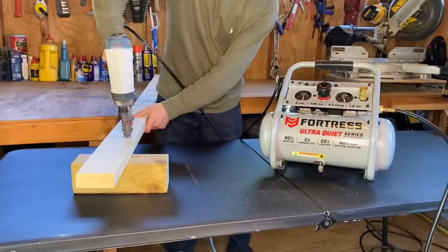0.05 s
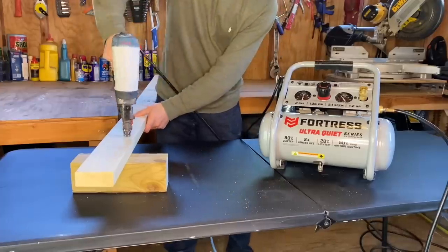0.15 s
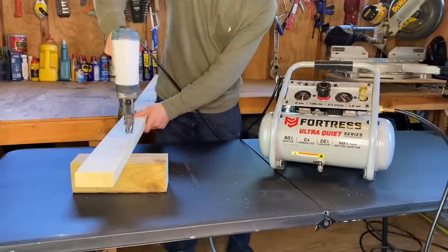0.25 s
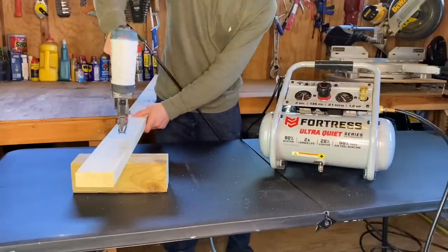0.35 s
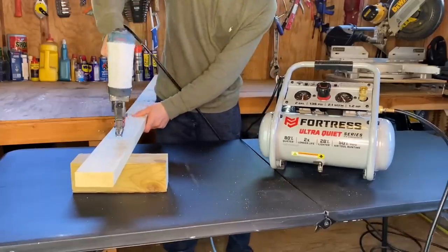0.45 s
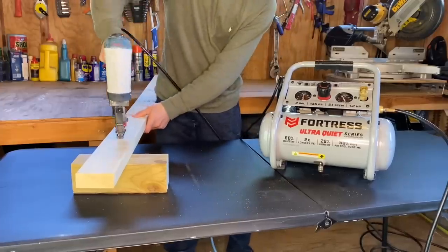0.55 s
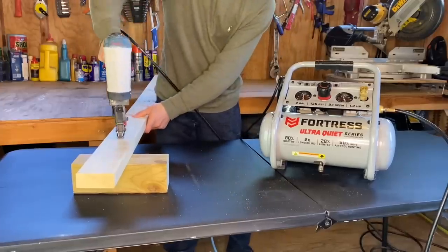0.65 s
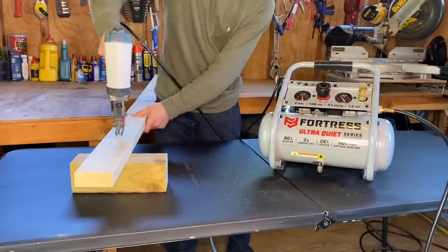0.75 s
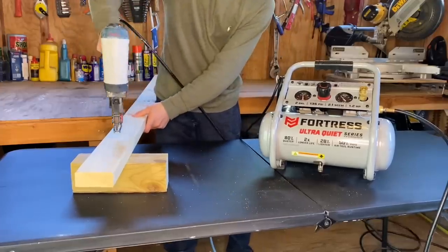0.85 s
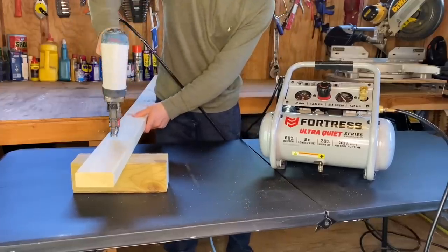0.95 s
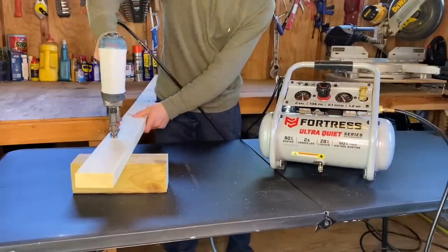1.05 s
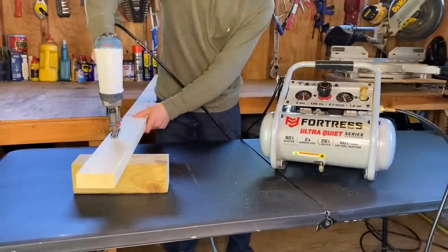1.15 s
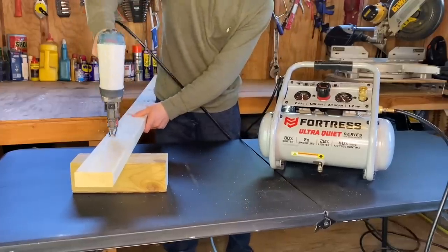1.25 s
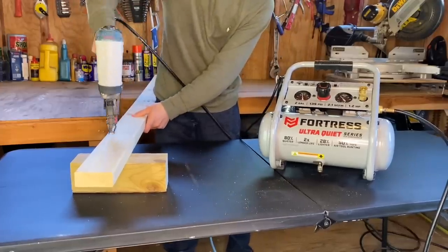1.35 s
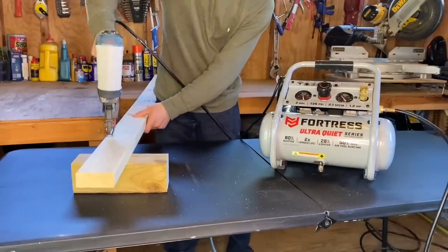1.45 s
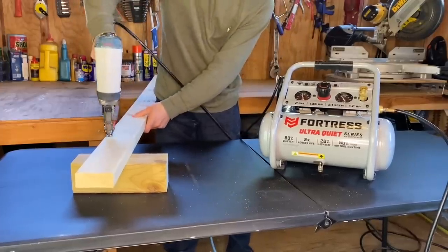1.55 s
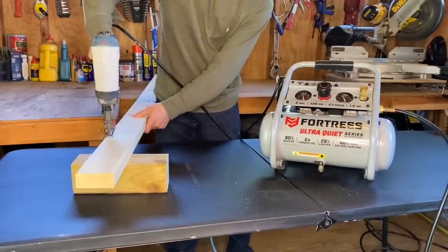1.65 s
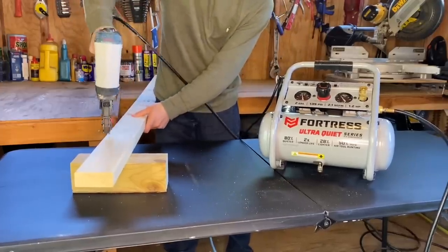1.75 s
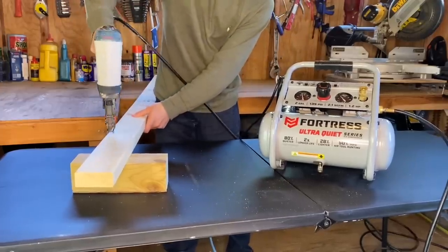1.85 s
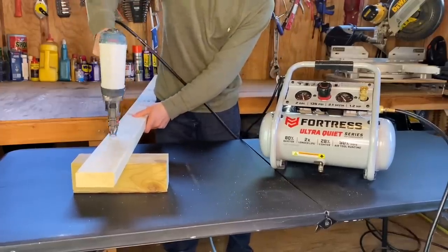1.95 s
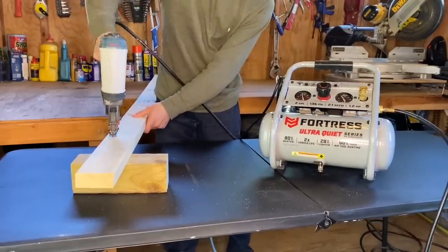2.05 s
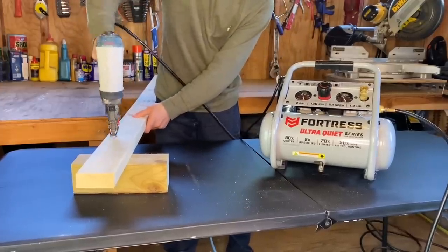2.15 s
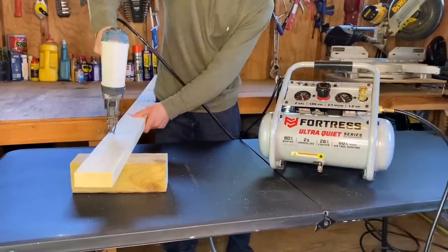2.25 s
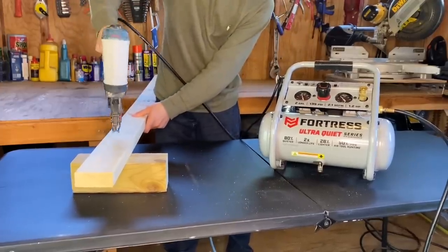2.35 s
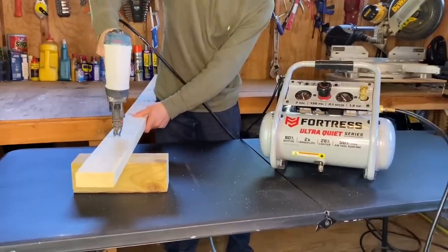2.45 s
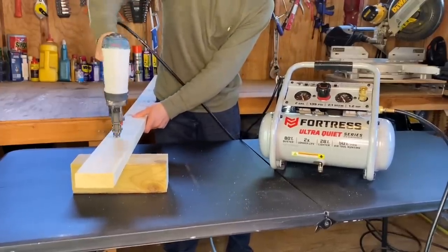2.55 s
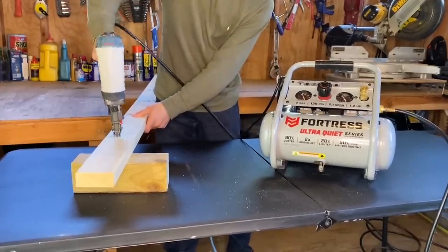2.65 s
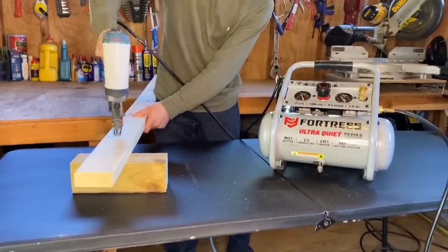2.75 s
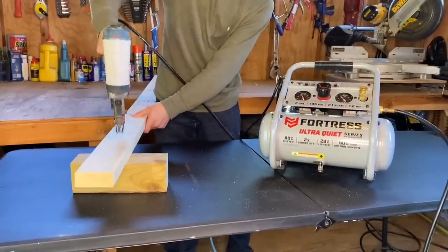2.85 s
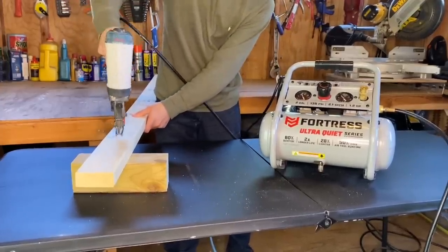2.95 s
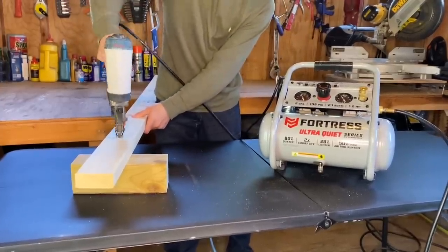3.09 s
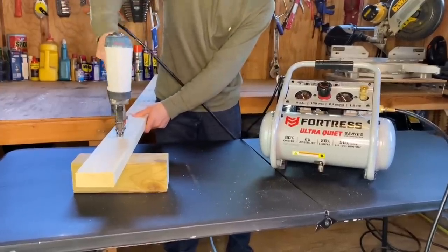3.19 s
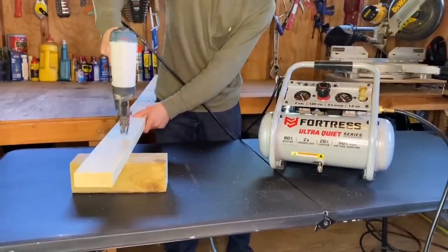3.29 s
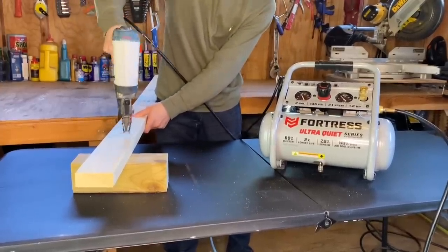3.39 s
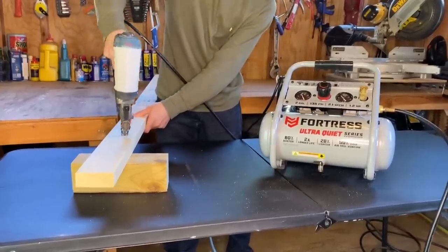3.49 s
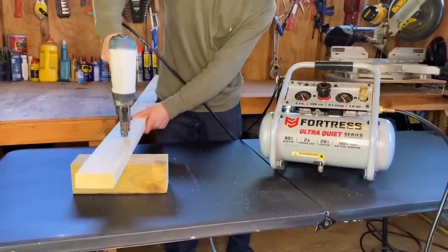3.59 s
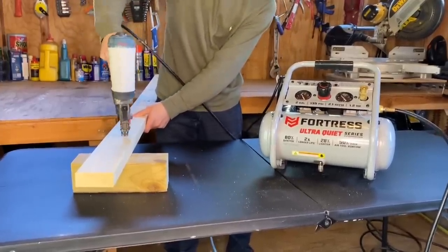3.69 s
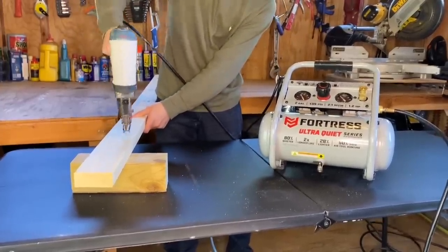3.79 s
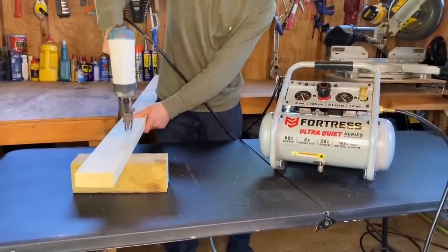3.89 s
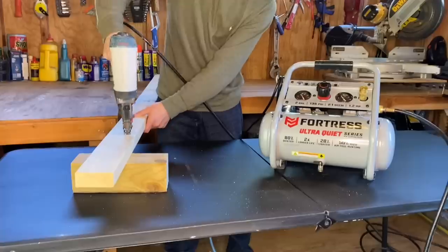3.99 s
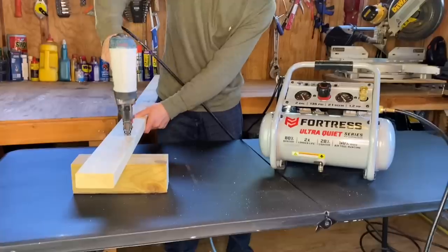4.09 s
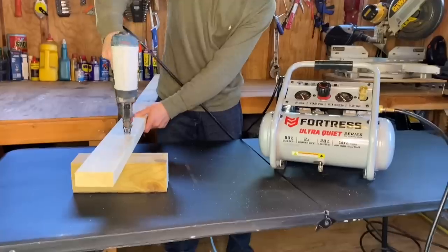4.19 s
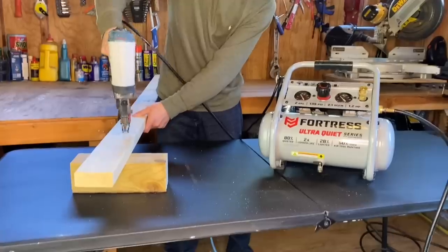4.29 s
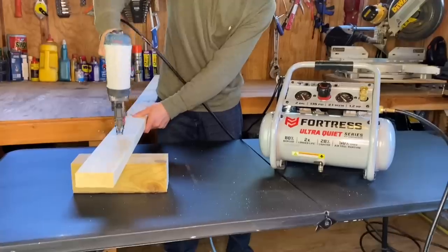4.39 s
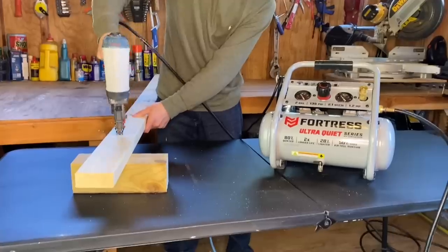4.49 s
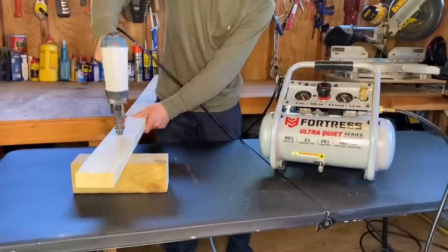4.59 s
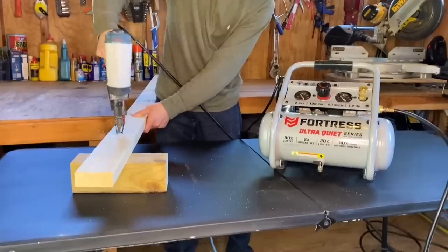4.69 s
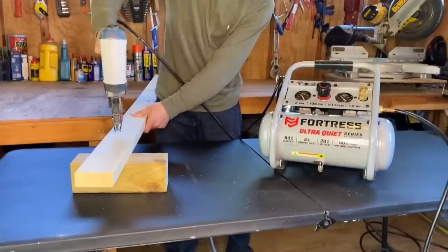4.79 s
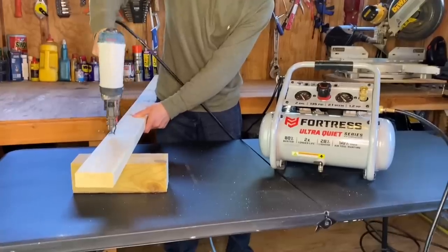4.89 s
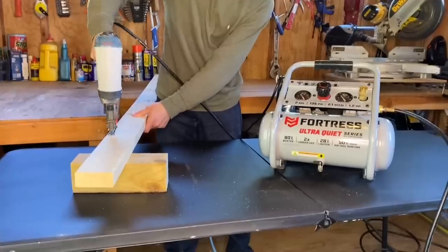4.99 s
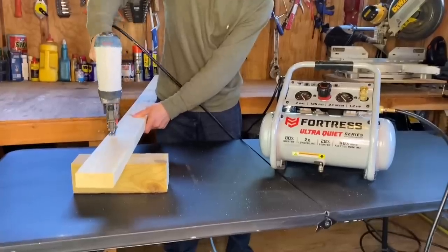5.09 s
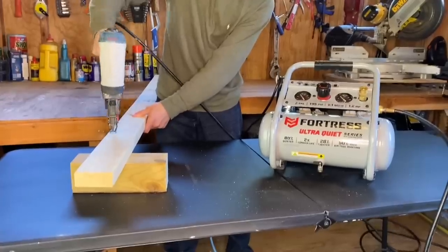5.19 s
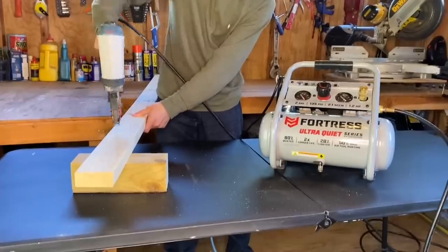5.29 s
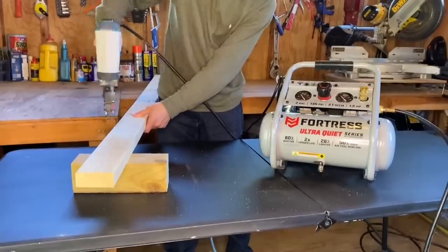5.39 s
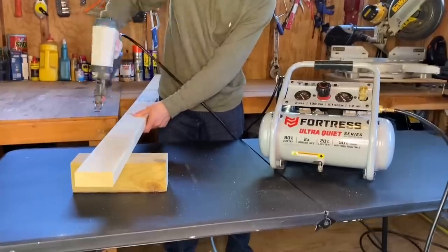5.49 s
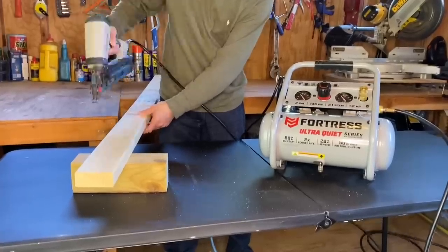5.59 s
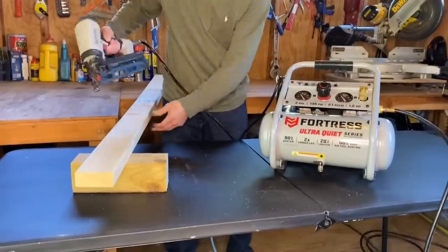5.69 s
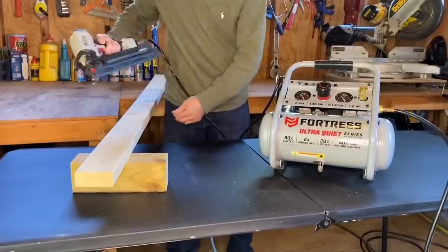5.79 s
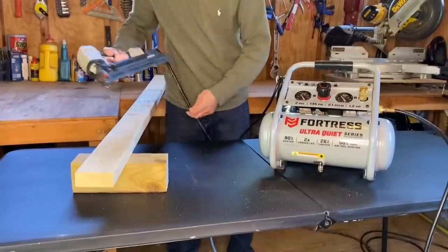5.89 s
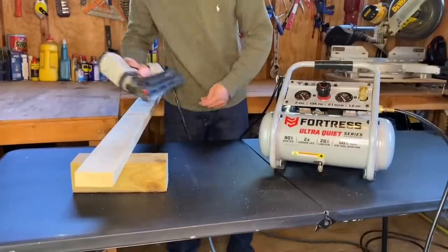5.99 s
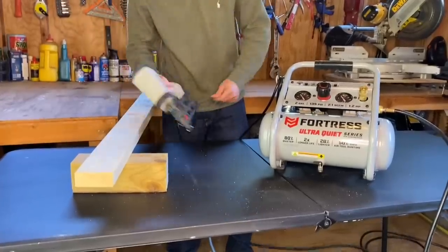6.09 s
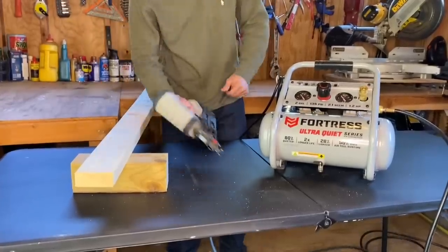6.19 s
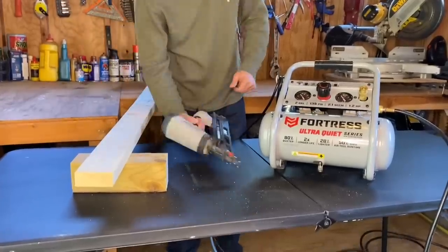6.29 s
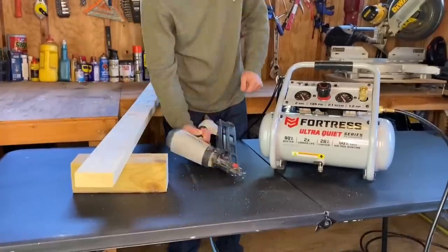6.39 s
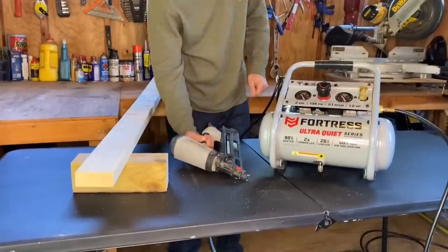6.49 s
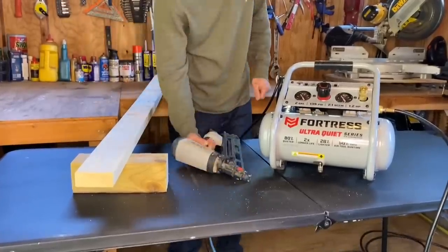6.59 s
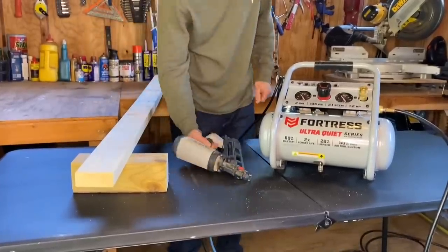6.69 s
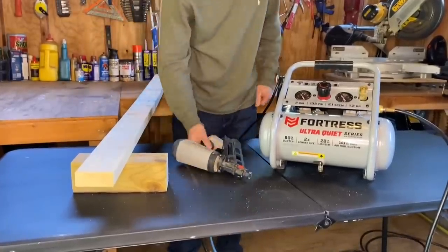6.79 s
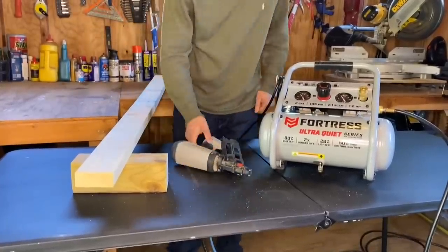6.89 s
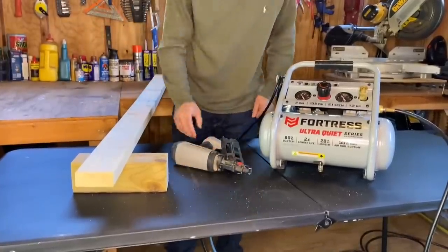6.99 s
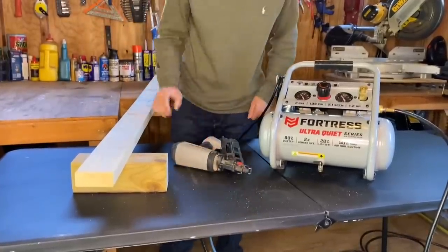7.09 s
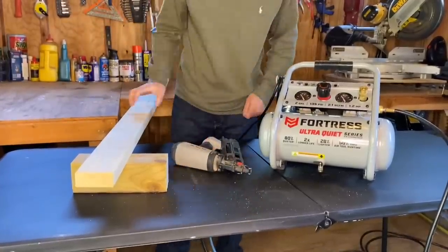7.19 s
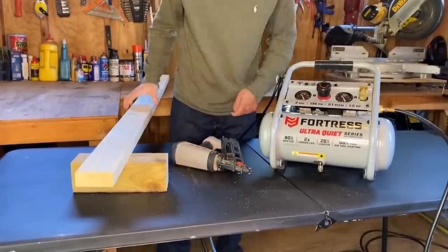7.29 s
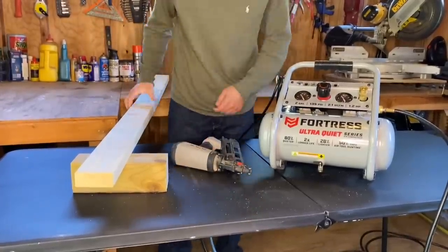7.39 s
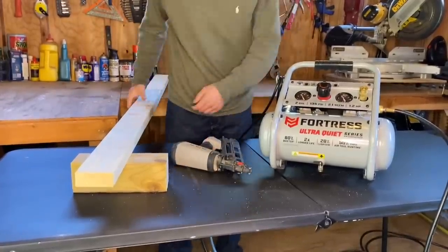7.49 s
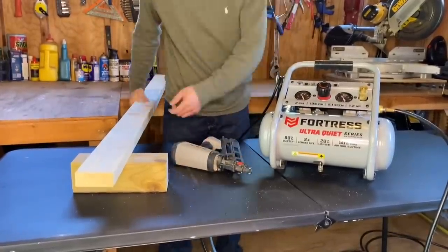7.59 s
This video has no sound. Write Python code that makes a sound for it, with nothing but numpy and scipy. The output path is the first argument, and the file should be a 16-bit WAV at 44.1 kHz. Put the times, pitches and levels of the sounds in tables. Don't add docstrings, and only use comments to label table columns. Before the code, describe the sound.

Close, overloaded sound of nails driven into wood: sharp steel crack, woody thump, short exhaust puff, repeated at an even pace of two per second for five seconds. Light metallic taps and scuffs precede the shots. A low compressor hum starts with a click and brief hiss near two seconds and continues beneath. Finally, dull table knocks and low rumble in a small shop.

```python
import sys
import numpy as np
from scipy import signal
from scipy.fft import rfft, irfft, next_fast_len
from scipy.io import wavfile
from scipy.ndimage import map_coordinates

SR = 44100
rng = np.random.default_rng(int(sys.argv[2]) if len(sys.argv) > 2 else 0)


def master_out(mix):
    frames = np.transpose(np.atleast_2d(mix))
    ceiling = np.clip(frames, -1, 1)
    pcm = np.round(ceiling * 32767).astype(np.int16)
    wavfile.write(sys.argv[1], SR, pcm)


def makeup_ratio(level_db):
    decades = np.asarray(level_db, float) / 20
    return 10 ** decades


N = 337263
PAD = 4096
T = np.arange(N + PAD) / SR - PAD / SR

# (trigger time [s], bite of the nail [dB])
SHOTS = [(-.0285, -1.5), (0.5335, -11), (1.0455, -3), (1.5344, -7.5), (2.0394, -11), (2.518, -4),
         (3.016, -6), (3.508, -5.5), (3.98, -1), (4.4465, -3.5), (4.9555, -4.5)]
BRIGHT_DB = [-0.9, 0.89, 0.21, 0.19, 0.19, -0.41, -1, -1.5, 0.049, -0.37, -1.8]
CYCLE_MS = [115, 116, 115.6, 116.9, 117.3, 118.9, 119.75, 121.7, 122.3, 123.8, 123.7]
# (frequency [Hz], level [dB/Hz])
CRACK = [(1060, -17.5), (1800, -0.5), (3800, -2), (4390, -9), (6620, -4), (7180, -5.5), (8230, -4),
         (13000, -19.5), (15900, -36.5)]
# (frequency [Hz], level [dB/Hz])
SPIT = [(5000, -36.5), (8000, -2.5), (11500, -0.5), (14500, -5), (15900, -15)]

STRIKE_MS, REBOUND_MS, REBOUND_DB = 26.7, 17, -10.5
TRIGGER_S, BITE_DB = np.transpose(SHOTS)
STRIKE_S = TRIGGER_S + STRIKE_MS / 1000
HOME_S = TRIGGER_S + np.array(CYCLE_MS) / 1000
SEATED_S = STRIKE_S + (3.3 + .125 * np.maximum(np.array(CYCLE_MS) - 118, 0)) / 1000
ALIKE_DB = 1.8
SHAFT_HZ, TOP_ORDER = 28.02, 44


def unit(x):
    return x / np.sqrt(np.mean(x ** 2) + 1e-20)


def along(points, hz):
    f, v = np.transpose(points)
    return np.interp(np.log(hz + 1), np.log(f + 1), v)


def coloured(x, spectrum):
    magnitude = makeup_ratio(along(spectrum, np.fft.rfftfreq(PAD, 1 / SR))) + 1e-6
    cep = irfft(np.log(magnitude))
    cep[1:PAD // 2] *= 2
    cep[PAD // 2 + 1:] = 0
    h = irfft(np.exp(rfft(cep)))
    return signal.fftconvolve(x, h / np.linalg.norm(h))[:len(x)]


def add(track, s, sound):
    track[round(s * SR) + PAD:][:len(sound)] += sound


def empty():
    return np.zeros(len(T) + SR)


def noise():
    return rng.standard_normal(len(T))


def step(at, slow):
    return .5 + .5 * np.tanh((T - at) / slow)


def gain_curve(rows):
    rows = np.array(rows)
    return makeup_ratio(np.interp(T, rows[:, 0], rows[:, 1], left=-120, right=-120))


def bursts(times, db, rise, t60, spectrum, tail_db, tail_t60, alike=0):
    track, t = empty(), np.arange(SR // 2) / SR
    tail = makeup_ratio(tail_db - 60 * t / tail_t60) * (1 - np.exp(-t / 0.0083))
    shape = np.hypot(makeup_ratio(-60 * t / t60), tail) * (1 - np.exp(-t / rise))
    same = rng.standard_normal(len(t))
    for s, level_db in zip(times, db):
        hiss = np.sqrt(alike) * same + np.sqrt(1 - alike) * rng.standard_normal(len(t))
        grain_db = map_coordinates(rng.standard_normal(len(t) // 20), [t / .002])
        add(track, s, makeup_ratio(level_db) * shape * unit(makeup_ratio(grain_db) * hiss))
    return coloured(track[:len(T)], spectrum)


def ringing(modes, scatter_db, rise=.0001):
    t = np.arange(0, min(.5, np.max(modes, axis=0)[-1]), 1 / SR)
    ring = 0
    for hz, db, t60 in modes:
        strength_db = db + rng.normal(0, scatter_db)
        ring = ring + makeup_ratio(strength_db - 60 * t / t60) * np.sin(2 * np.pi * hz * t)
    return ring * (1 - np.exp(-t / rise))


def resonant(peaks):
    f = np.fft.rfftfreq(len(T), 1 / SR)
    gain = sum(makeup_ratio(db) * f * w / np.hypot(c * c - f * f, f * w) for c, w, db in peaks)
    gain = gain / (1 + (f / 11000) ** 6)
    return unit(irfft(rfft(noise()) * gain, len(T)))


def room(x):
    # (frequency [Hz], T60 [s])
    decay_times = [(60, 0.62), (260, 0.32), (700, 0.32), (1800, 0.26), (5000, 0.38), (13000, 0.22)]
    hz, t, z = signal.stft(rng.standard_normal(SR // 2), SR, nperseg=256)
    decay = makeup_ratio(-60 * t / along(decay_times, hz)[:, None])
    tail = signal.istft(z * decay, SR, nperseg=256)[1]
    return signal.fftconvolve(np.pad(x, (200, 0)), tail / np.linalg.norm(tail))[:len(x)]


def plank():
    mode_hz = [70, 123, 174, 262, 329, 372, 448, 560, 618, 800, 405, 1115, 1198, 1366, 1590, 186, 746]
    # (level [dB], T60 [s])
    mode_ring = [(-27.5, 0.31), (-27, 0.58), (-1.5, 0.23), (-10.5, 0.38), (-5, 0.34), (3.5, 0.23),
                 (-16, 0.18), (2, 0.24), (-5.5, 0.32), (1, 0.14), (-0.5, 0.049), (1.5, 0.18), (0.5, 0.14),
                 (-2.5, 0.13), (-2.5, 0.09), (-15, 0.28), (-5, 0.14)]
    return np.column_stack([mode_hz, mode_ring])


def stillness():
    # (frequency [Hz], level [dB/Hz])
    quiet = [(15, -28.5), (25, 4.5), (124, -10), (631, -22.5), (1640, -30), (4730, -25), (6130, -39),
             (8800, -48), (12000, -49.5), (15600, -67), (22000, -120)]
    # (frequency [Hz], width [Hz], level [dB])
    whine = [(3070, 30, 0), (3790, 60, -5), (4610, 25, 0), (7590, 25, -3), (8670, 25, 0), (8970, 22, -2),
             (11200, 25, -8)]
    return makeup_ratio(-54.0) * coloured(noise(), quiet) + makeup_ratio(-66) * resonant(whine)


def table_sway():
    # (time [s], swing [full scale], length [s])
    lurches = [
        (6.325, .05, .07),
        (6.398, -0.089, 0.026),
        (6.502, -0.048, 0.038),
        (6.705, .12, 0.043),
        (7.095, 0.1, 0.059),
        (7.33, 0.074, 0.059),
    ]
    f = np.fft.rfftfreq(len(T), 1 / SR)
    sway = unit(irfft(rfft(noise()) / (1 + (f / 12) ** 4) * (f > 3), len(T)))
    motion = makeup_ratio(-36.5) * step(6.5, .06) * sway
    for s, swing, length in lurches:
        u = ((T - s) / length) ** 2
        motion = motion + swing * (1 - 2 * u) * np.exp(-u)
    return motion


def valves():
    # (frequency [Hz], level [dB])
    reeds = [(740, -33), (1250, 0.5), (2350, -8.5), (3020, -0.5), (3260, -8), (3610, 4), (5000, -22.5),
             (6500, -44), (11000, -120)]
    f = np.fft.rfftfreq(len(T), 1 / SR)
    z = np.zeros(len(f), complex)
    order_hz = SHAFT_HZ * np.arange(TOP_ORDER + 1, 5000 // SHAFT_HZ)
    sizes = makeup_ratio(along(reeds, order_hz) + rng.normal(0, 3, len(order_hz)))
    z[np.searchsorted(f, order_hz)] = sizes * np.exp(2j * np.pi * rng.random(len(order_hz)))
    return unit(irfft(z, len(T)))


def pump_air(turn):
    # (frequency [Hz], level [dB/Hz])
    intake = [(110, -26), (190, -1), (562, -14.5), (714, -1.5), (777, -5), (1030, 1.5), (1250, -6),
              (1830, -20.5), (1970, -7), (2300, -9.5), (2640, -4.5), (3760, -22), (5500, -27), (7150, -60),
              (12100, -120)]
    hiss = [(2940, -22), (5000, -9), (6250, -8.5), (8100, -9), (8780, -12), (10300, -7), (11100, -19.5),
            (13500, -22), (15700, -30)]
    # (frequency [Hz], width [Hz], level [dB])
    shroud = [(2200, 60, -4), (2750, 90, 2.5), (3080, 150, 1.5), (3510, 71, 0), (3910, 38, 2.5),
              (4790, 80, -3.5), (7870, 590, -10.5)]
    pulse = 1 + 0.12 * np.sin(turn) + 0.21 * np.sin(4 * turn) + 0.087 * np.sin(5 * turn)
    air = coloured(pulse * noise(), intake) + makeup_ratio(-4.5) * pulse * resonant(shroud)
    return air + makeup_ratio(-3.5) * valves() + makeup_ratio(-15.5) * coloured(noise(), hiss)


def motor_hum(since, loaded):
    mains_hz = 120
    hum = makeup_ratio(-5 * loaded - 45.5) * np.sin(2 * np.pi * mains_hz * T + 2.0)
    hum = hum + makeup_ratio(-58.0) * np.sin(2 * np.pi * 176 * T)
    hum = hum + makeup_ratio(-61.5) * np.sin(2 * np.pi * 9 * mains_hz * T)
    draw_db = 24 * np.exp(-since / 0.19)
    draw_db = draw_db + 4.5 * np.cos(2 * np.pi * (T - 4.42) / 1.38)
    return makeup_ratio(draw_db) * hum


def compressor():
    # (multiple, level [dB])
    strokes = [(4, 2), (6, -6), (8, -7), (9, -13.5), (11, -12.5), (12, -15), (15, -27.5), (18, -17),
               (23, -19), (25, -13.5), (26, -8.5), (30, -10.5), (32, -17), (33, -6.5), (34, -5), (36, -5.5),
               (37, -13.5), (38, -8), (41, -12), (42, -7)]
    # (time [s], level [dB])
    start_vent = [
        (1.79, -53),
        (1.84, -45.5),
        (1.91, -47.5),
        (1.97, -57),
    ]
    # (frequency [Hz], level [dB/Hz])
    vent_colour = [(2350, -39), (4000, -5), (4570, -23.5), (7850, -8), (10100, -13), (13300, -23),
                   (15000, -32.5)]
    turn = 2 * np.pi * SHAFT_HZ * T
    since = np.maximum(T - 1.83, 0)
    running = 1 - np.exp(-since / 0.14)
    loaded = step(6.75, 0.13)
    strong, orders = dict(strokes), 0
    for k in range(strokes[0][0], TOP_ORDER + 1):
        order_db = strong.get(k, -23 + 5.5 * rng.normal())
        orders = orders + makeup_ratio(order_db) * np.sin(k * turn + rng.uniform(0, 2 * np.pi))
    low = makeup_ratio(-49.5 + 2 * loaded) * np.sin(2 * turn) + makeup_ratio(-56.5 + 12 * loaded) * np.sin(3 * turn)
    puffs = 1 + .5 * np.sin(turn * running)
    vent = gain_curve(start_vent) * puffs * coloured(noise(), vent_colour)
    pump = makeup_ratio(-42.5) * unit(orders) + makeup_ratio(-45.5) * pump_air(turn)
    return running * (pump + motor_hum(since, loaded) + low) + vent


def pressure_switch():
    # (frequency [Hz], level [dB], T60 [s])
    contact = [(2750, 0, 0.011), (3950, -5, 0.011), (9000, -8, .008)]
    track = empty()
    add(track, 1.7262, makeup_ratio(-18) * ringing(contact, .5))
    return track[:len(T)]


def laying_down():
    # (time [s], clack peak [dB], table boom [dB], knock pitch [Hz], knock level [dB])
    impacts = [(6.333, -23.5, -28, 570, -32), (6.36, -26, -26, 312, -30.5), (6.416, -28, -27.5, 327, -33),
               (6.494, -24, -22, 268, -30), (6.515, -43, -40, 175, -35), (6.545, -32, -28.5, 350, -48),
               (6.637, -23.5, -37, 313, -30.5), (6.672, -38, -27.5, 413, -31), (6.745, -32, -39, 246, -43),
               (6.869, -25.5, -31, 177, -30), (6.905, -35, -23.5, 328, -47)]
    # (frequency [Hz], level [dB], T60 [s])
    table = [(83.5, -7, 0.25), (127, 4, 0.25), (175.8, 0.5, 0.44)]
    # (frequency [Hz], level [dB/Hz])
    thud = [(120, -59), (200, -2), (307, 6), (574, 0), (662, -8), (976, -27), (1500, -8), (1950, -52),
            (3300, -120)]
    # (time [s], level [dB])
    clink = [
        (6.3382, -40.5),
        (6.645, -51),
    ]
    wood = empty()
    for at, clack_db, boom_db, hz, db in impacts:
        add(wood, at, makeup_ratio(db) * ringing([(hz, 0, .16)], .5, 0.0051))
        add(wood, at, makeup_ratio(boom_db - 6.5) * ringing(table, 2.9))
        add(wood, at, makeup_ratio(clack_db - 27) * ringing(plank()[3:9], 3.8))
    s, clack_db = np.transpose(impacts)[:2]
    clacks = bursts(s, clack_db - 5.5, 0.00061, 0.037, thud, -8.0, 0.34)
    return wood[:len(T)] + clacks + bursts(*np.transpose(clink), .0004, .03, CRACK, -8, .1)


def nose_contacts():
    # (time [s], tick peak [dB], low knock [dB], scuff
    # [dB])
    contacts = [(0.3841, -43, -45, -35), (0.399, -25.5, -32, -38), (0.431, -29, -24.5, -29),
                (0.878, -33.5, -35, -36.5), (0.9182, -28.5, -26, -36), (1.3523, -40, -38, -37),
                (1.4081, -28, -33.5, -36), (1.726, -19, -45, -35), (1.873, -35, -34, -33),
                (1.92, -25, -27, -37.5), (2.2842, -48, -40, -38), (2.376, -32, -31.5, -41),
                (2.41, -26, -30.5, -33), (2.896, -32, -35.5, -39), (2.955, -29, -38, -40),
                (3.416, -25, -31, -35), (3.8428, -38, -50, -40), (3.9053, -26.5, -28, -25),
                (4.382, -29, -37, -42), (4.782, -38, -43, -45), (4.8521, -41, -35.5, -40),
                (5.351, -35, -48, -39), (6.338, -31, -45, -44), (6.479, -36, -42, -40),
                (6.6425, -36, -33, -37)]
    # (frequency [Hz], level [dB/Hz])
    tick = [(710, -32), (1200, -6), (2120, -7), (3600, 5), (4890, -7.5), (5610, -7), (8570, -12),
            (12000, -22), (15000, -34.5)]
    scuff = [(240, -25), (400, -2), (1050, 2.5), (1650, -5.5), (1890, -11), (3000, -5.5), (3900, -28),
             (6600, -120)]
    knock = [(35, -12), (60, -6.5), (178, 4), (280, -10.5), (343, -4.5), (519, -17.5), (600, -8.5),
             (780, -49), (1320, -120)]
    # (frequency [Hz], level [dB], T60 [s])
    tip = [(3400, -8, .025), (4070, -4, 0.04), (7300, -6, 0.014)]
    # (time [s], level [dB])
    slack = [
        (.5094, -57),
        (1.012, -46),
        (1.032, -36),
    ]
    s, tick_db, knock_db, scuff_db = np.transpose(contacts)
    out = bursts(s, tick_db - 5.5, 0.00064, 0.033, tick, -3.0, 0.13)
    out = out + bursts(s, scuff_db, 0.0022, 0.043, scuff, -1.0, 0.26)
    out = out + bursts(s, knock_db - 3.0, 0.0072, 0.22, knock, -2.3, 0.61)
    out = out + bursts(*np.transpose(slack), 0.00023, .012, tick, -5, 0.12)
    rings, snaps = empty(), empty()
    for k, at in enumerate(s):
        add(snaps, at, [makeup_ratio(tick_db[k] - 2.0)])
        add(rings, at, makeup_ratio(tick_db[k] - 13) * ringing(tip, 3.0, 0.00055))
        add(rings, at, makeup_ratio(knock_db[k] - 14) * ringing(plank()[1:8], 2.0))
    return out + coloured(snaps[:len(T)], tick) + rings[:len(T)]


def tip_pings():
    # (time [s], frequency [Hz], level [dB], T60 [s])
    springs = [(.3985, 13250, -53, .07), (.4318, 13250, -60, .07), (.879, 2900, -47, .2)]
    pings = [(.3981, 3400, -28, .03), (.4085, 3700, -36, 0.027), (.4318, 3650, -27, .02),
             (.919, 3800, -38, .03), (.919, 7700, -38, .02), (1.4096, 3500, -38, .03),
             (1.92, 3600, -42, .03), (2.41, 3600, -34, .03), (1.033, 3600, -46, .015)]
    track = empty()
    for s, hz, db, t60 in springs:
        add(track, s, makeup_ratio(db) * ringing([(hz, 0, t60)], .5))
    for s, hz, db, t60 in pings:
        add(track, s, makeup_ratio(db) * ringing([(hz, 0, t60)], .5, .0006))
    return track[:len(T)]


def filling_air():
    # (frequency [Hz], level [dB/Hz])
    jet = [(88, -32), (150, 16), (512, -5.5), (885, -6), (1530, 9), (2210, -5.5), (2800, 5), (5430, -11),
           (7710, -4), (11800, -17), (15900, -24)]
    gate = empty()
    for s in TRIGGER_S:
        add(gate, s + 0.00018, np.ones(round(STRIKE_MS * SR / 1000)))
    return makeup_ratio(-20) * gate[:len(T)] * coloured(noise(), jet)


def pressure_bump(at, wide):
    ms = np.arange(SR // 100) * 1000 / SR
    return np.exp(-((ms - at) / wide) ** 2)


def valve_pop():
    # (delay [ms], gain)
    pop_echoes = [(0, 1), (1.95, 0.15), (2.65, 0.27), (3.55, 0.36)]
    track = empty()
    for s in TRIGGER_S:
        for lag, gain in pop_echoes:
            pop = 0.88 * pressure_bump(lag + 1.62, 0.13) - .5 * pressure_bump(lag + 1.04, 0.34)
            add(track, s, gain * makeup_ratio(rng.normal(0, .35)) * pop)
    return track[:len(T)]


def piston_draw():
    track = empty()
    for s in STRIKE_S:
        add(track, s - .004, 0.27 * (.5 * pressure_bump(5, 2.56) - pressure_bump(6.2, 1.28)))
    return track[:len(T)]


def exhaust(force_db):
    # (frequency [Hz], level [dB/Hz])
    blast = [(880, -21.5), (1500, -17), (1850, -19.5), (2180, 1), (2430, -10), (3610, -1), (5300, -8),
             (8690, -5.5), (13500, -21.5), (15900, -26)]
    opens = HOME_S - .0503
    out = bursts(opens, force_db - 11.5, 0.0015, 0.087, blast, -4.5, 0.31)
    out = out + bursts(opens + .0033, force_db - 19.0, 0.0011, .05, SPIT, -22.5, .15)
    return out + bursts(SEATED_S, force_db - 22.5, .0005, .045, SPIT, -11.0, .12)


def home_bump(back_db):
    # (delay [ms], gain)
    home_hits = [(0, 1.02), (3.4, -0.58), (5.3, 0.45), (11.4, -0.48), (14.3, -0.37), (25.7, -0.31),
                 (29.3, .2), (43.2, -0.061)]
    # (frequency [Hz], level [dB/Hz])
    thump = [(120, -24), (300, -11), (800, 0.5), (1400, -6.5), (2200, -20), (4000, -37.5), (6500, -63),
             (11000, -120)]
    track = empty()
    for s, db in zip(HOME_S, back_db):
        for lag, gain in home_hits:
            add(track, s + lag / 1000, [gain * makeup_ratio(db + 9.0)])
    return coloured(track[:len(T)], thump)


def cap_ring(back_db):
    # (frequency [Hz], level [dB], T60 [s])
    cap = [(364, -2.5, 0.11), (600, -4, 0.054), (695, -4, 0.11), (756, -0.5, .09), (860, -9, 0.1),
           (907, -9, 0.12), (973, -1, 0.14), (1055, -12.5, 0.062), (1380, -18, .1), (1372, -8.5, 0.14),
           (1456, -12, 0.088), (7860, -22, 0.25), (8300, -24, .12), (12900, -30, .15)]
    # (frequency [Hz], level [dB/Hz])
    return_colour = [(120, -32.5), (200, -19.5), (461, -21), (700, -9.5), (1000, -9.5), (1270, -11),
                     (1550, -10), (1850, -10), (3620, -31), (5000, -19), (6500, -53.5), (11000, -120)]
    track = empty()
    for s, db in zip(HOME_S, back_db):
        add(track, s, makeup_ratio(db - 13.5) * ringing(cap, ALIKE_DB, 0.0065))
    return track[:len(T)] + bursts(HOME_S, back_db - 22, 0.00035, 0.087, return_colour, -1, 0.29, .8)


def steel():
    # (frequency [Hz], level [dB], T60 [s])
    driver = [(2250, -10, .1), (2590, -9, .1), (2800, -10, .1), (3100, -3, .11), (3390, -8, .12),
              (3570, -3, .12), (3720, -3, .11), (3950, -7, .1), (4740, -16, .09), (6230, -10, .016),
              (7920, -11, .09), (8400, -14, .09)]
    track = empty()
    for s, bright_db in zip(STRIKE_S, BRIGHT_DB):
        modes = np.array(driver)
        modes[:, 0] *= 1 + .02 * rng.standard_normal(len(modes))
        add(track, s, makeup_ratio(-15 + bright_db) * ringing(modes, 3, 0.0002))
    return track[:len(T)]


def nail_crack():
    crack_db = np.array(BRIGHT_DB) + 0.3 * BITE_DB - 9.0
    crack = bursts(STRIKE_S, crack_db, 0.00058, 0.14, CRACK, -1.3, 0.21)
    return crack + bursts(STRIKE_S, BITE_DB - 7.0, .0001, 0.014, CRACK, -35.5, .1)


def struck_modes(force_db):
    # (frequency [Hz], level [dB], T60 [s])
    housing = [(292.7, -7.5, 0.37), (500, -4.5, 0.24), (653, -16, 0.089), (693, -3, 0.14), (863, 3, 0.093),
               (990, -9.5, 0.099), (1090, -3.5, 0.18), (1280, -1, 0.1), (1398, 1.5, 0.059),
               (1510, -7, 0.082), (1684, -1.5, .12)]
    shop_modes = [(36.2, -7, 0.26), (64.9, -6.5, 0.31), (84.8, -9, 0.41), (122.2, -10, 0.42),
                  (172.9, -0.5, 0.33)]
    # (frequency [Hz], level [dB/Hz])
    rattle = [(190, -34), (330, 0), (600, -4), (1170, 0), (2060, -10), (2900, -8.5), (3640, -2),
              (5000, -15), (6500, -25), (11000, -120)]
    track = empty()
    for s, db in zip(SEATED_S, force_db):
        add(track, s, makeup_ratio(db - 13.0) * ringing(plank(), ALIKE_DB))
        add(track, s, makeup_ratio(db - 15.0) * ringing(housing, ALIKE_DB, 0.0016))
        add(track, s, makeup_ratio(db - 13) * ringing(shop_modes, ALIKE_DB, 0.029))
        rebound = makeup_ratio(db + REBOUND_DB - 22.0) * ringing(plank()[1:6], ALIKE_DB)
        add(track, s + REBOUND_MS / 1000, rebound)
    return track[:len(T)] + bursts(SEATED_S, force_db - 8.5, 0.0015, 0.084, rattle, -2.4, 0.21, .8)


def slam(force_db):
    # (delay [ms], gain)
    slam_hits = [(0, 0.63), (.45, 0.42), (3.1, 0.46), (5.2, 0.79), (7.6, 0.18), (10.8, 0.23), (16.3, 0.59),
                 (20.8, 0.15), (29.5, 0.57), (32.7, 0.22), (39.8, 0.25), (45.1, 0.25)]
    # (frequency [Hz], level [dB/Hz])
    slam_colour = [(40, -42), (120, -22.5), (189, 0.5), (284, -4), (420, 3.5), (588, -0.5), (962, 1),
                   (1170, -2), (2080, -6), (3630, 0.5), (5000, -21), (6500, -40.5), (11000, -120)]
    dull = np.hanning(11) / 5
    track = empty()
    for s, db in zip(SEATED_S, force_db):
        for lag, gain in slam_hits:
            add(track, s + lag / 1000, gain * makeup_ratio(db + 21.5) * (dull if lag > 6 else np.ones(1)))
        add(track, s + REBOUND_MS / 1000, [makeup_ratio(db + REBOUND_DB + 23.0)])
    return coloured(track[:len(T)], slam_colour)


def nailer():
    force_db, back_db = -0.4 * rng.standard_normal((2, len(SHOTS)))
    impulses = valve_pop() + piston_draw() + slam(force_db)
    home = home_bump(back_db)
    shop = makeup_ratio(-5.5) * room(impulses + makeup_ratio(-2.5) * home)
    rush = filling_air() + exhaust(force_db) + cap_ring(back_db)
    return impulses + home + shop + rush + steel() + nail_crack() + struck_modes(force_db)


def scene():
    background = stillness() + table_sway() + compressor() + pressure_switch()
    handling = laying_down() + nose_contacts() + tip_pings()
    return (background + handling + nailer())[None, PAD:]


def band_limit(x):
    return signal.sosfilt(signal.butter(12, 15790, fs=SR, output="sos"), x)


def record(dry):
    m = next_fast_len(N + PAD)
    z = rfft(dry, m) / (1 + (np.fft.rfftfreq(m, 1 / SR) / 15850) ** 100)
    clipped = np.clip(irfft(z, m)[:, :N], -.97, .97)
    return band_limit(clipped)


dry = scene()
out = record(dry)
master_out(out)
```